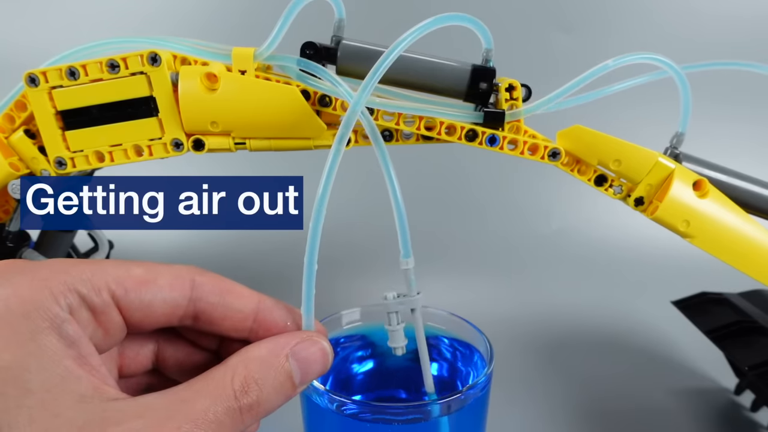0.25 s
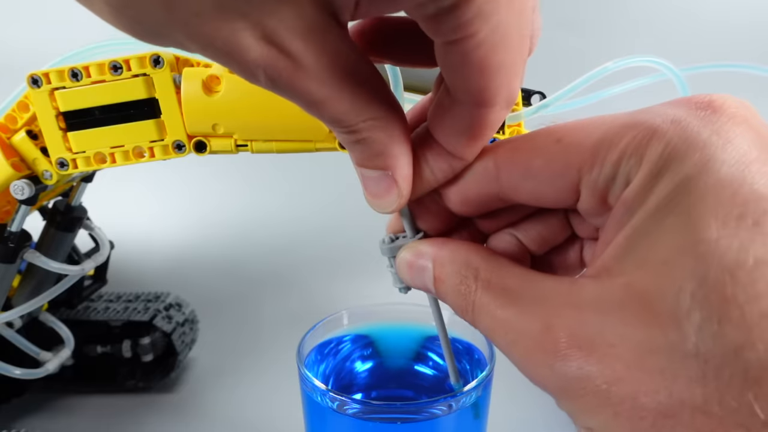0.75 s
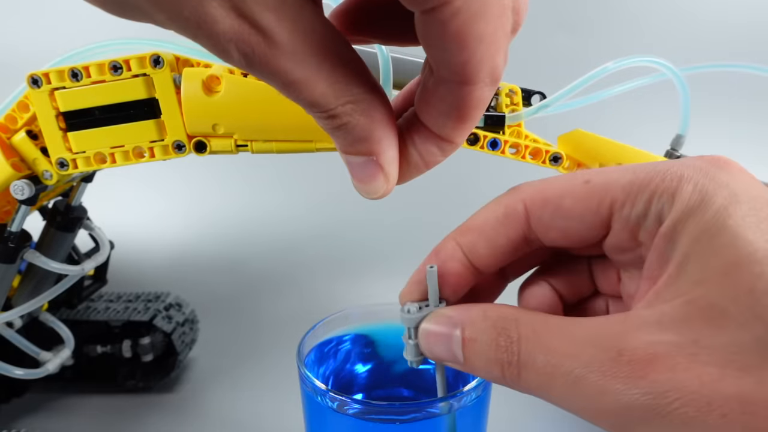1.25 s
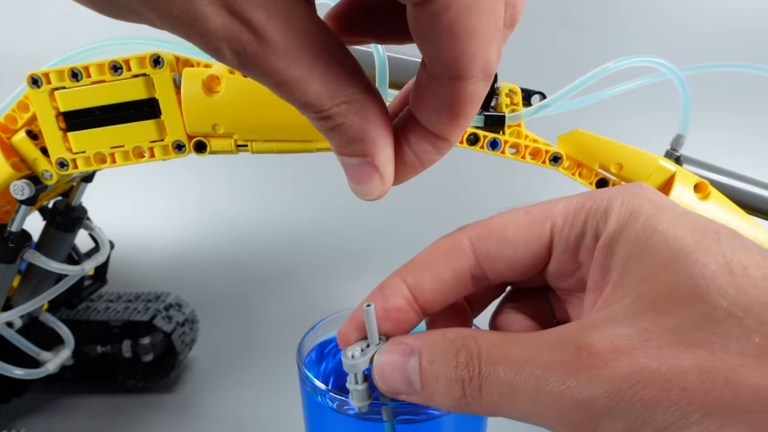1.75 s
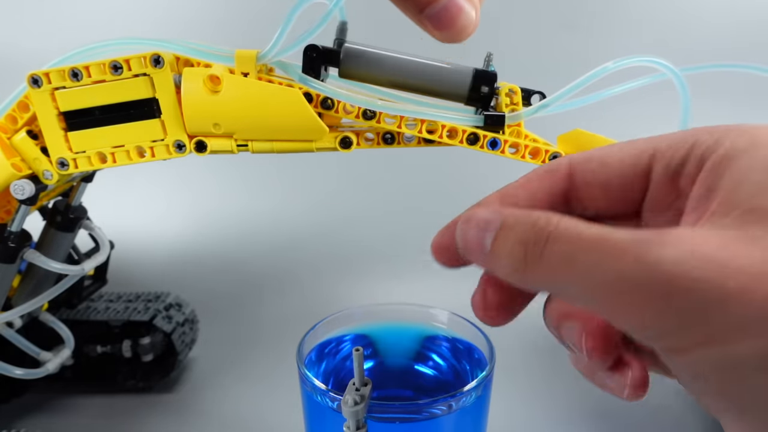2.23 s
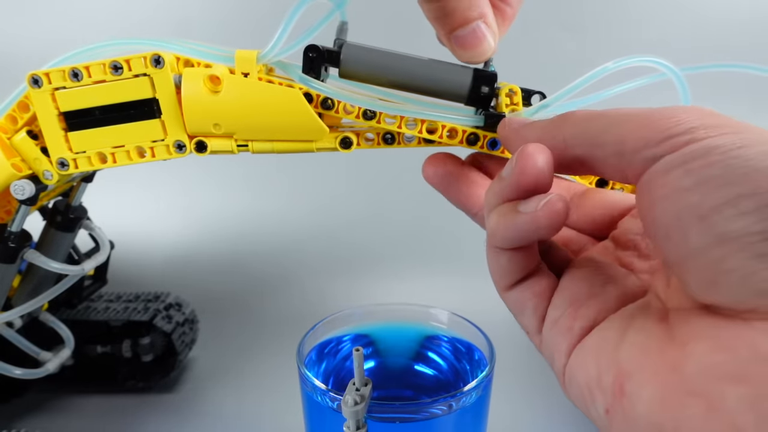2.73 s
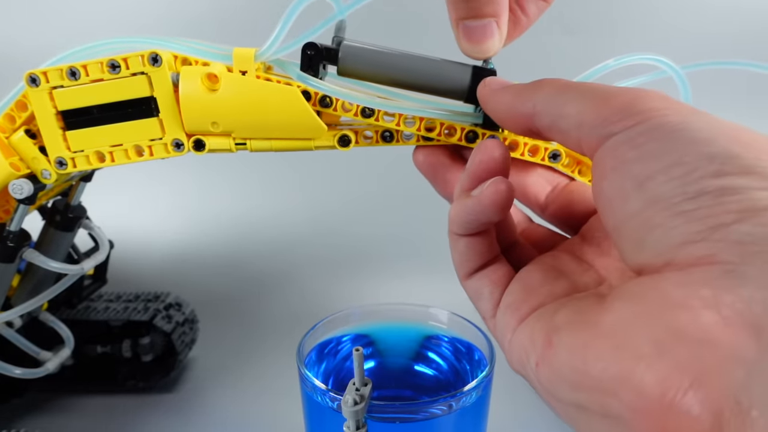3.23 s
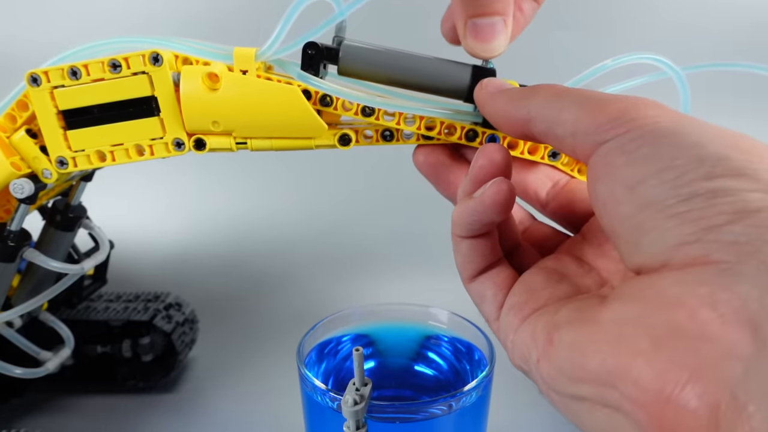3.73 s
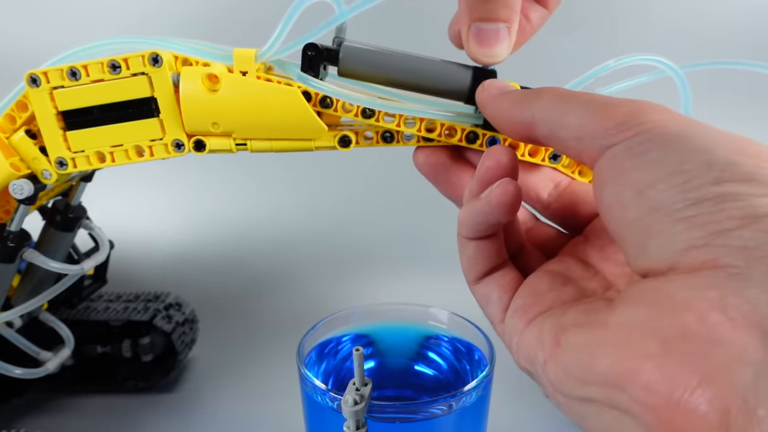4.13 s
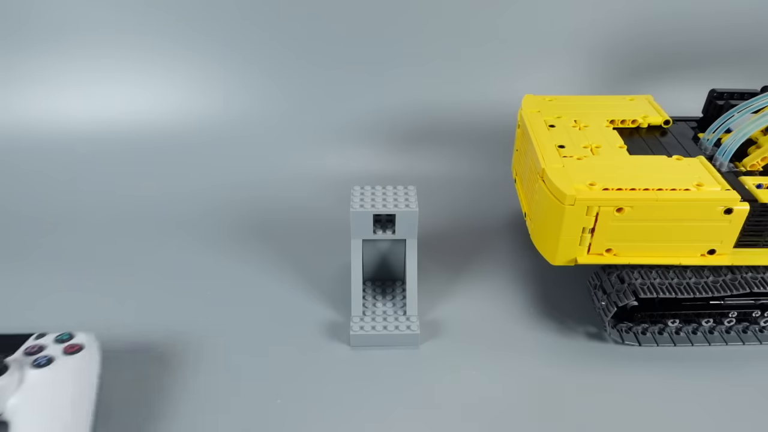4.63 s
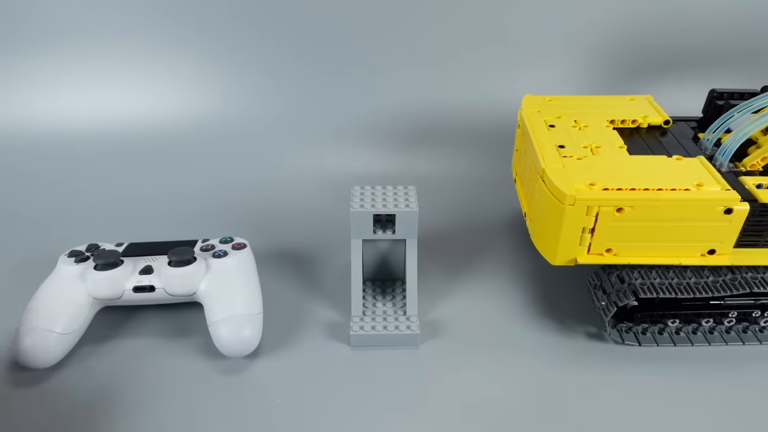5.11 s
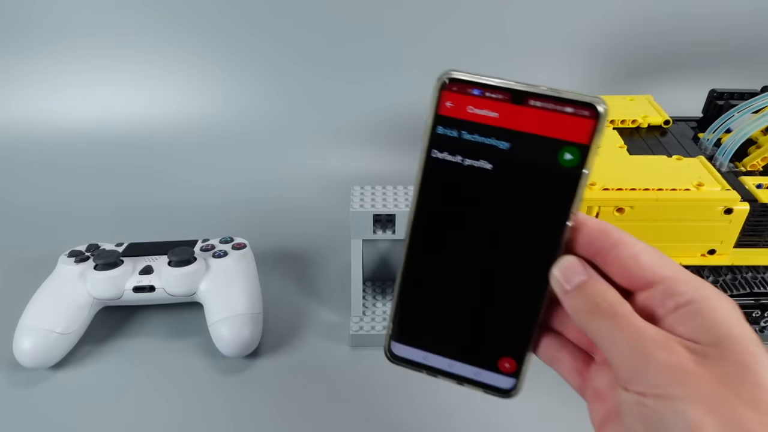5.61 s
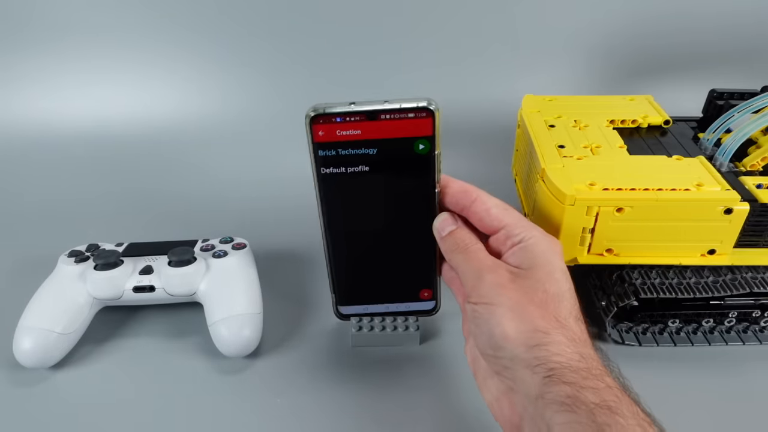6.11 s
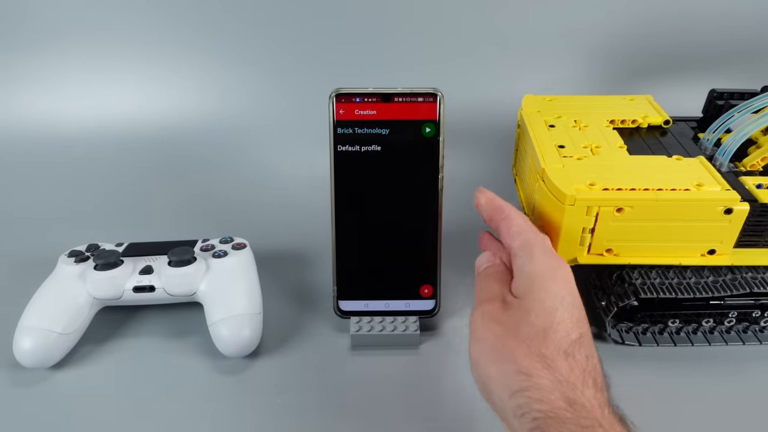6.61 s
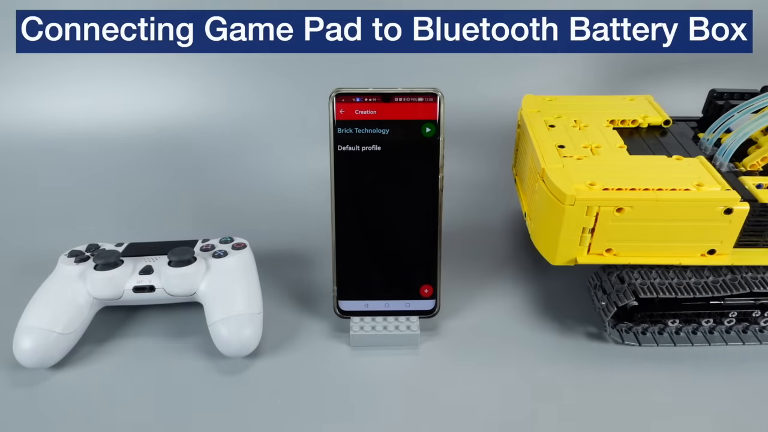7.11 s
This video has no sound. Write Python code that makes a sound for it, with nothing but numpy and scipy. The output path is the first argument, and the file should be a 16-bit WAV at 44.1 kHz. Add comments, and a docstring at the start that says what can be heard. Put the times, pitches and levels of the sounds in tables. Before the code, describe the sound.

A small motor hums briefly and cuts out, fingers clink a plastic valve on glass, then a controller slides and knocks on a bench.

```python
"""A small electric motor drives a toy pump on a workbench, runs down and is quickly faded out: rotor tones,
gear whine and brush hiss. Fingers clink a plastic valve against a glass (ringing modes) and fumble with small
parts (ticks and knocks); a plastic handset slides across the bench (stick-slip rumble, shell and scrape noise),
a phone is set into a stand with a few knocks (decaying tones, bench modes, noise bursts) and a part snaps
(damped modes). A small quiet room with hum, hiss and diffuse echoes, heard by two spaced microphones."""
import sys
import numpy as np
from scipy import signal
from scipy.fft import rfft, irfft
from scipy.io import wavfile

SR = 44100
rng = np.random.default_rng(int(sys.argv[2]) if len(sys.argv) > 2 else 0)


def unload_wav(signal):
    """Save mono or channel-first audio to the path in sys.argv[1] as 16-bit WAV at rate SR, clipped to [-1, 1]."""
    wavfile.write(
        sys.argv[1],
        SR,
        np.round(np.clip(np.atleast_2d(signal).T, -1, 1) * 32767).astype(np.int16),
    )


N = 324576

# Rotor tones. Each row: multiple of the rotor pitch, relative level in dB.
ROTOR_ORDERS = [(.5, -35.5), (1, 0), (3, -36), (4, -36.5), (5, -37.5)]
# Gear whine. Each row: full-speed pitch in Hz, width in Hz, relative level in dB, swing with the gear wheel
# and swing with the pump stroke, both as a share of the amplitude.
MESH = [(1936, 45, -9, -.45, .3), (1895, 110, -15, -.4, .3), (2540, 40, -19, 0, .2),
        (3830, 60, -21, .3, .1), (5145, 90, -15, .3, .1), (5745, 140, -7, .4, .15),
        (5610, 200, -13, .4, .15), (7765, 70, -14, .3, .1)]
# Motor housing resonances. Each row: pitch in Hz, width in Hz, relative level in dB.
HOUSING = [(579.5, 31, -9.5), (910, 44, -13.5), (1777, 170, -14), (2351, 94, -23), (5550, 237, -11),
           (6900, 45.1, -15.5), (7300, 96, -14), (8800, 83, -19), (9280, 200, -19), (11700, 110, -21)]
# Brush hiss spectrum. Each row: frequency in Hz, relative level in dB per Hz.
BRUSHES = [(300, -23.5), (700, -11.5), (1400, -14), (2000, -10), (3200, -12.5), (5700, -8), (8000, -8.5),
           (10300, -20), (13000, -19.5), (15500, -31)]
ROTOR_HZ, HUM_DB, GEAR_DB = 229, -27.5, -42.5   # rotor pitch, level of the hum, level of gears and brushes
MOTOR_BALANCE_DB, MOTOR_LAG_S = 3, .00085   # right channel of gears and brushes: softer; brush hiss also later
# rotor turns per wheel turn and per pump stroke, with starting angles
WHEEL_RATIO, WHEEL_RAD, STROKE_RATIO, STROKE_RAD = 6, 1.7, 18, 2.5
SLOWS_S, SLOWING_S, CRAWL = .485, .06, .62   # gears run down: start, time constant, final share of speed
# power off: the hum drops, the gears fade
OFF_S, HUM_DROP_S, HUM_DROP_DB, COAST_DB_PER_S = 0.5114, 0.02, -18, -240
END_S, END_FADE_S, END_FADE_DB = 0.584, 0.017, -35   # quick fade-out of motor and echoes together

# Valve against the glass, after a faint high shimmer in the first row. Each row: start in seconds, ring level
# in dB, octaves above the lowest mode where the ring is strongest, level of the lowest modes in dB, knock
# level in dB, tick level in dB.
CLINKS = [(1.215, -92, 2.8, -77, -91, -83), (1.2456, -62.5, 1.57, -70, -67, -68),
          (1.4595, -73, 2.04, -76, -63, -54.5), (1.5964, -50, 2.29, -69, -51, -58),
          (1.7667, -49, 1.52, -78.5, -52.5, -51.5), (1.8579, -56.5, 1.56, -81, -47.5, -54.5),
          (1.9159, -51.5, 2.6, -94, -51, -79), (1.935, -51, 1.7, -75, -53, -78),
          (1.947, -37.5, 1.68, -53.5, -38, -39), (1.9659, -53.5, 1.1, -68, -36.5, -58)]
# Glass modes. Each row: pitch in Hz, relative level in dB, decay time t60 in seconds.
GLASS = [(1738.5, -4, 0.42), (1748.2, -1, 0.38), (3703, -1.5, 0.2), (3710, -15, 0.55), (6354, -15, 0.26),
         (6565, -1, 0.16), (6576, -16, .35), (8359, -3, 0.09), (8821, -9, 0.11), (10280, 1, 0.11),
         (10900, -7, 0.12), (12300, -22, .06), (14620, -5, .05)]
CLINK_BELOW_DB, CLINK_ABOVE_DB = -16.5, -17   # fall per octave on each side of the strongest pitch
CLINK_CRACK_DB, CLINK_KNOCK_HZ = 1.5, 169   # crack against the ring; knock in the bench

# Fingers tap small parts, and the phone rocks in its stand. Each row: start in seconds, knock level in dB,
# tick level in dB, tick pitch in Hz.
TAPS = [(0.826, -55, -53, 1170), (0.897, -49, -60.5, 800), (0.943, -41.5, -57, 810), (0.986, -50, -74, 750),
        (1.02, -52, -66, 1000), (3.376, -55.5, -60, 950), (3.441, -51.5, -60, 920), (3.587, -52, -71, 800),
        (3.692, -66, -63, 940), (3.846, -53, -60, 1010), (3.879, -45, -72, 900), (3.928, -61, -69, 2380),
        (3.956, -49, -68, 1000), (4.002, -49, -69, 2000), (4.012, -52, -59, 1100),
        (4.056, -62, -59.5, 2570), (4.065, -57, -56, 1840), (4.096, -52, -54.5, 2050),
        (4.107, -49.5, -69, 2270), (4.126, -52, -60, 1470), (4.15, -52, -64, 890),
        (4.231, -50.5, -59, 1200), (5.66, -78, -62, 1190), (6.346, -43.5, -52, 1310),
        (6.379, -44, -52, 1170), (6.393, -45.5, -62, 1590)]
TAP_HZ, TAP_SPREAD, TAP_CRACK_DB = 215, 0.053, -6.5   # knock pitch, its log scatter, crack against tick
# Handset and phone on bench and stand: each row is a knock, or one pitch or later swing of a knock.
# Each row: start in seconds, knock level in dB, knock pitch in Hz, tick level in dB, crack level in dB,
# left minus right in dB.
KNOCKS = [(4.297, -39, 217.6, -61, -84, 5), (4.638, -9, 190, -37.5, -49.5, -3),
          (4.6552, -11, 187, -52.5, -49, -0.5), (4.841, -16, 204.2, -28.5, -65.5, -1),
          (5.012, -24, 157, -43, -83.5, 1), (6.0488, -19.5, 420, -40, -39, 0.5),
          (6.069, -21.5, 286, -33.5, -43, 3), (6.0723, -15.5, 420, -60, -60, 1),
          (6.073, -18.5, 137.6, -75, -83, -1), (6.091, -15.5, 150, -52, -78, 2),
          (6.127, -36, 188, -52, -50, 3), (6.141, -27.5, 129, -78, -80, -5),
          (6.168, -13, 407, -27.5, -30, 5.5), (6.192, -25.5, 191, -63, -42, -2),
          (6.216, -30.5, 120, -70, -85, 3.5), (6.5651, -10.5, 197, -51, -61.5, 4.5),
          (6.5665, -8.5, 395, -37.5, -30, 4.5), (6.5807, -10.5, 327, -40, -65, -4.5),
          (6.589, -14, 208, -38, -64, 3), (6.609, -19, 235, -55, -70.5, -1),
          (6.654, -23, 231, -43.5, -95, 1), (6.679, -27, 150, -57, -73, -2), (6.695, -40, 230, -54, -77, 3),
          (6.738, -42, 170, -61, -77, 0)]
# Bench modes. Each row: pitch in Hz, relative level in dB, decay time t60 in seconds.
BENCH = [(121.2, -13.5, 0.4), (146.6, -6.5, 0.4), (185.5, -1, 0.29), (261.4, -14, 0.22), (227, -1, 0.31),
         (308, -17, 0.16), (350, -4, 0.1), (384, -14.5, 0.25), (478, -16, 0.2), (540, -14.5, 0.28),
         (553, -18.5, 0.23)]
THUD_DB, THUD_FALL_DB = -14, -3.5   # thud against the knock; fall per octave away from the knock pitch
TICK_HZ, TICK_WIDTH, HAND_PAN_DB = 1040, 1.54, -0.5   # usual tick centre, edges as a ratio; left minus right
OVERTONE_HZ, OVERTONE_FALL_DB = 390, -5   # deeper knocks have weaker overtones, per octave
HAND_LAG_S = .00042   # slide, knocks and rustle reach the right microphone later

# Fingers rustle over small parts. Each row: start of the hold in seconds, hold in seconds, level in dB.
RUSTLE = [(0.942, 0.095, -64.5), (1.95, 0.0044, -46.5), (3.87, 0.057, -80), (4.05, 0.15, -72),
          (6.24, 0.17, -64)]
RUSTLE_RISE_DB_PER_S, RUSTLE_FALL_DB_PER_S = 399, 349.5

# Handset sliding. Each row: time in seconds, bench rumble in Hz, rumble level in dB, scrape level in dB.
SLIDE = [(4.27, 220, -61.5, -72), (4.385, 230.3, -35, -50.5), (4.425, 235.7, -22.5, -46.5),
         (4.48, 216.8, -20, -45), (4.54, 199.2, -21.5, -44.5), (4.61, 194, -21, -41.5),
         (4.672, 188.4, -27.5, -43.5), (4.75, 224.4, -26, -48), (4.814, 192.5, -24.5, -49),
         (4.875, 185.6, -40, -51.5), (4.97, 183.6, -32, -58.5), (5.01, 160.1, -33, -64),
         (5.22, 155.2, -67.5, -103)]
# Scrape spectrum. Each row: frequency in Hz, relative level in dB per Hz.
SCRAPE = [(380, 0), (650, -5.5), (1150, -3.5), (3150, -9), (15500, -34)]
# Handset shell resonances. Each row: pitch in Hz, width in Hz, relative level in dB.
HANDSET = [(323.1, 6.7, 12.5), (432.3, 37, 3.5), (593, 35, 5.5), (761, 36, -12.5), (913, 24, -12)]
# the handset rocks from grip to grip as it slides
ROCK_FIRST_S, ROCK_HZ, ROCK_DEPTH, ROCK_DIES_S = 4.433, 20.3, .6, .25
# shell against scrape, before and after it lies flat
LANDS_S, LANDING_S, SHELL_TILTED_DB, SHELL_FLAT_DB = 4.62, 0.057, -3.5, 12.5

# A plastic part snaps. Each row: time in seconds, level in dB.
SNAPS = [(7.3413, -24), (7.3441, -26), (7.3452, -13)]
# Modes of that part. Each row: pitch in Hz, relative level in dB, decay time t60 in seconds.
PART = [(1640, -26, 0.018), (2010, 1.5, 0.0067), (2260, -40, 0.018), (3430, -30, 0.0085),
        (4140, -19, 0.0044), (5670, -15.5, 0.0048), (7850, -8, 0.0014)]
SNAP_ROOM_DB = -14   # send into the room

# Diffuse echoes. Each row: nominal band centre in Hz, decay time t60 in seconds, relative level in dB.
ROOM = [(170, 0.21, 5.5), (500, 0.34, -0.5), (2000, 0.37, -1.5), (6000, 0.38, -4.5), (12000, 0.13, -5)]
# Room tone over time. Each row: time in seconds, hum level in dB.
STILL = [(0, -61.5), (2.2, -64), (3.3, -63.5), (4.2, -61), (5.4, -64), (7.36, -62.5)]
# Hum spectrum. Each row: frequency in Hz, relative level in dB per Hz.
HUM = [(13, -34.5), (22, -5.5), (64, -11), (80, -13.5), (97, -0.5), (123, -9), (232, -6.5), (352, -18),
       (446, -18), (523, -26), (566, -24.5), (893, -32), (2500, -44), (3250, -65), (5500, -120)]
# Hiss spectrum. Each row: frequency in Hz, relative level in dB per Hz.
HISS = [(880, -32.5), (1500, -12.5), (2630, -8.5), (2850, -9), (14200, -12), (15800, -21)]
HISS_DB = -20.5   # against the hum
DEEP_DB = -20   # what the low cut leaves of the deep bass
CUTOFF_HZ = 16000


def motor():
    """The unbalanced rotor hums through the bench; gears whine and brushes hiss through the housing."""
    turn = 2 * np.pi * ROTOR_HZ * np.arange(N) / SR
    wheel = np.cos(turn / WHEEL_RATIO + WHEEL_RAD)
    stroke = np.cos(turn / STROKE_RATIO + STROKE_RAD)
    hum = np.sqrt(2) * sum(from_db(db) * np.sin(k * turn) for k, db in ROTOR_ORDERS)
    hum = hum + from_db(-18) * narrow(0.9 * turn, 49.0)      # a neighbouring bench mode is shaken too
    hum_gain = from_db(HUM_DB + HUM_DROP_DB * ramp(OFF_S, HUM_DROP_S)) * quick_fade()

    gears = gear_whine(wheel, stroke) + brush_hiss(turn, wheel, stroke)
    left, right = gears * from_db(GEAR_DB) * gear_fade()
    left = left + resonant(left, [(1650, 270, 1.7)])      # the housing beams its middle range to the left
    air = np.array([left, right * from_db(-MOTOR_BALANCE_DB)])
    return air + hum * hum_gain * from_db([[-1.2], [1.2]])


def gear_whine(wheel, stroke):
    """Meshing teeth sing wavering tones that sink as the gears slow and swing with wheel and stroke."""
    t = np.arange(N) / SR
    speed = CRAWL + (1 - CRAWL) * np.exp(-np.maximum(t - SLOWS_S, 0) / SLOWING_S)
    run = 2 * np.pi * np.cumsum(speed) / SR
    whine = 0
    for hz, width_hz, db, wheel_swing, stroke_swing in MESH:
        load = 1 + wheel_swing * wheel + stroke_swing * stroke
        whine = whine + from_db(db) * narrow(hz * run, width_hz) * load
    return whine * from_db(-70 * (1 - speed))      # unloaded teeth hardly sing


def brush_hiss(turn, wheel, stroke):
    """Rubbing brushes make noise, partly through the housing resonances, swinging with the load."""
    white = stereo(lambda: rng.standard_normal(N), alike=0.091)
    white = white * (1 + 0.05 * np.sin(turn) + .12 * wheel + .05 * stroke)
    white = white * from_db(2.0 * narrow(0, 300))      # ragged tooth contact
    hiss = from_db(-7.5) * rms_one(resonant(white, HOUSING)) + from_db(1.0) * coloured(white, BRUSHES)
    late = np.roll(hiss[1], round(MOTOR_LAG_S * SR))      # the right microphone is further away
    return np.array([hiss[0], late])


def quick_fade():
    """Gain of the quick fade-out that takes away motor and echoes together."""
    last = ramp(END_S - END_FADE_S, END_FADE_S)
    return from_db(END_FADE_DB * last) * (last < 1)


def gear_fade():
    """Gain of the gear and brush noise as the motor coasts, then the quick fade-out."""
    return from_db(COAST_DB_PER_S * ramp(OFF_S, 1)) * quick_fade()


def clinks():
    """Each clink best rings one range of upper glass modes; its push on the whole wall rings the lowest pair."""
    s, db, best, lowest_db, *_ = np.transpose(CLINKS)      # the first row is only a faint high shimmer
    octaves = np.log2(np.array(GLASS)[:, 0] / GLASS[0][0])
    away = octaves - best[:, None]
    fall_db = CLINK_ABOVE_DB * np.maximum(away, 0) + CLINK_BELOW_DB * np.maximum(-away, 0)
    mode_db = np.where(octaves < .5, lowest_db[:, None], db[:, None] + fall_db)
    # neighbours start opposed, so pairs beat
    return struck(s, mode_db, 2.0, GLASS, spread_db=2.0, neighbour=-1)


def knocks():
    """Each row of a contact: a short knock tone, a soft thud in the bench modes, a tick and a crack of noise."""
    s, knock_db, knock_hz, tick_db, crack_db, pan_db, tick_hz = contacts()
    away = abs(np.log2(np.array(BENCH)[:, 0] / knock_hz[:, None]))
    thud_db = knock_db[:, None] + THUD_DB + THUD_FALL_DB * away
    out = struck(s, thud_db, 2.0, BENCH, spread_db=2.0)
    # the push lasts about a millisecond
    out = signal.sosfilt(signal.butter(2, 600, fs=SR, output="sos"), out)

    t = np.arange(2500) / SR
    white = rng.standard_normal((len(s), 2, 2, len(t)))      # row, tick or crack, channel, time
    white = white + 0.5 * white[:, :, ::-1, ::-1].sum(axis=2, keepdims=True)      # partly shared by both channels
    white[..., 0] += 9      # a sharp first contact
    crack = band(white[:, 1] * from_db(-60 * t / 0.034), 2300, 9500)
    crack = crack + from_db(-9) * band(white[:, 1] * from_db(-60 * t / 0.0072), 10000, 15500)      # the very edge
    for k in range(len(s)):
        low_hz, high_hz = tick_hz[k] / TICK_WIDTH, tick_hz[k] * TICK_WIDTH
        tick = band(white[k, 0] * from_db(-60 * t / 0.037), low_hz, high_hz)
        hit = from_db(knock_db[k] + 3.0) * knock_tone(t, knock_hz[k])
        hit = hit + from_db(tick_db[k] + 2.5) * tick + from_db(crack_db[k] - 6.0) * crack[k]
        at = round(s[k] * SR)
        out[:, at:at + len(t)] += hit * from_db([[pan_db[k] / 2], [-pan_db[k] / 2]])
    return -out      # the first swing pulls the air away


def contacts():
    """Columns of all contact rows: bench and stand, taps and rocking, and a knock just before each glass row."""
    rows = [(*row, TICK_HZ) for row in KNOCKS]
    for s, db, tick_db, tick_hz in TAPS:
        hz = TAP_HZ * np.exp(TAP_SPREAD * rng.standard_normal())
        rows.append((s, db, hz, tick_db, tick_db + TAP_CRACK_DB, HAND_PAN_DB, tick_hz))
    for s, db, _, _, knock_db, tick_db in CLINKS:
        crack_db = db + CLINK_CRACK_DB
        rows.append((s - .002, knock_db, CLINK_KNOCK_HZ, tick_db, crack_db, HAND_PAN_DB, TICK_HZ))
    return np.transpose(rows)


def knock_tone(t, hz):
    """A struck part swings up within a cycle and dies within a few, with two inharmonic overtones."""
    cycles = t * hz
    overtones = from_db(-10.0) * np.sin(2 * np.pi * 1.7 * cycles)
    overtones = overtones + from_db(-24.0) * np.sin(2 * np.pi * 3.646 * cycles)
    overtones = overtones * from_db(OVERTONE_FALL_DB * np.log2(OVERTONE_HZ / hz))
    envelope = from_db(-60 * cycles / 8.3) * (1 - np.exp(-(cycles / 0.4) ** 2))
    return (np.sin(2 * np.pi * cycles) + overtones) * envelope


def rustle():
    """Dense, uneven, faint ticks, duller towards the treble; each spell swells, holds and fades."""
    t = np.arange(N) / SR
    spells = 0
    for s, hold_s, db in RUSTLE:
        rise_db = RUSTLE_RISE_DB_PER_S * np.maximum(s - t, 0)
        fall_db = RUSTLE_FALL_DB_PER_S * np.maximum(t - s - hold_s, 0)
        spells = spells + from_db(db - rise_db - fall_db)
    ticks = rng.random(N) < 2500 / SR      # 2500 a second on average
    ticks = ticks * from_db(3 * np.minimum(rng.exponential(1, N), 3)) * rng.standard_normal((2, N))
    return spells * coloured(ticks, [(400, 10.5), (1000, -6.5), (3000, -24), (9000, -29.0)])


def slide():
    """Stick-slip under the handset shakes the bench, rings the shell and scrapes."""
    rumble_hz, rumble_db, scrape_db = in_time(SLIDE)
    shell_db = scrape_db + SHELL_TILTED_DB + (SHELL_FLAT_DB - SHELL_TILTED_DB) * ramp(LANDS_S, LANDING_S)
    phase = 2 * np.pi * np.cumsum(rumble_hz) / SR
    since = np.arange(N) / SR - ROCK_FIRST_S
    rocking = 1 + ROCK_DEPTH * np.exp(-abs(since) / ROCK_DIES_S) * np.cos(2 * np.pi * ROCK_HZ * since)
    steady = rocking * np.sin(phase + np.array([[.4], [-.4]]))      # regular slips
    rumble = steady + from_db(-8) * stereo(lambda: narrow(phase, 60), alike=0.1)

    grit = stereo(lambda: rng.standard_normal(N), alike=0.06)
    grit = grit * from_db(1.6 * rng.exponential(1, N))      # uneven grains
    grit = grit * from_db(1.3 * narrow(0, 80))      # the drag comes in gusts
    shell = from_db(shell_db) * rms_one(resonant(grit, HANDSET))
    scrape = from_db(scrape_db) * coloured(grit, SCRAPE)
    return (from_db(rumble_db) * rumble + shell + scrape) * during(SLIDE)


def snaps():
    """Three quick blows on a small damped part, too small to radiate bass."""
    s, db = np.transpose(SNAPS)
    blows = struck(s, np.repeat(db[:, None], len(PART), axis=1), 0, PART, spread_db=1.0)
    return band(band(blows, 1050, 15200), 1200, 5200)


def room(x):
    """Diffuse echoes: noise that dies band by band, its own for each channel."""
    t, tail = np.arange(SR // 2) / SR, 0
    edges_hz = [120, 250, 1000, 4000, 9000, 18000]
    for low, high, (_, t60, db) in zip(edges_hz, edges_hz[1:], ROOM):
        noise = band(rng.standard_normal((2, len(t))), low, high)
        tail = tail + noise * from_db(db - 60 * t / t60)
    tail = tail * np.clip(t / 0.0006 - .5, 0, 1) / np.sqrt(SR / 40)      # echoes set in within a millisecond
    return signal.fftconvolve(x, tail, axes=1)[:, :N]


def room_tone():
    """A low hum of the building and the hiss of the microphones."""
    hum = stereo(lambda: coloured(rng.standard_normal(N), HUM), alike=0.05)
    hiss = coloured(rng.standard_normal((2, N)), HISS)
    return from_db(in_time(STILL)[0]) * (hum + from_db(HISS_DB) * hiss)


def from_db(db):
    """Gain of a level in dB."""
    return 10 ** (np.asarray(db) / 20)


def rms_one(x):
    """Scaled to rms 1."""
    return x / np.sqrt(np.mean(x ** 2) + 1e-20)


def ramp(start_s, length_s):
    """0 before the start, rising straight to 1."""
    return np.clip((np.arange(N) / SR - start_s) / length_s, 0, 1)


def in_time(rows):
    """Columns of a curve table, one value a sample."""
    s, *columns = np.transpose(rows)
    return [np.interp(np.arange(N) / SR, s, c) for c in columns]


def during(rows):
    """1 inside the span of a curve table, 0 outside."""
    t = np.arange(N) / SR
    return (t >= rows[0][0]) & (t <= rows[-1][0])


def coloured(x, spectrum):
    """Signal shaped by a (Hz, dB per Hz) spectrum, falling 12 dB per octave below its lowest row; rms 1."""
    hz = np.arange(N // 2 + 1) * SR / N + 1      # 1 Hz up, to keep the logarithm finite
    at, db = np.transpose(spectrum)
    shape_db = np.interp(np.log(hz), np.log(at), db) - 12 * np.maximum(np.log2(at[0] / hz), 0)
    return rms_one(irfft(rfft(x) * from_db(shape_db), N))


def narrow(phase, width_hz):
    """Noise of a given width around a moving pitch: a wavering tone, rms 1."""
    r = np.exp(-np.pi * width_hz / SR)
    a, b = signal.lfilter([1], [1, -2 * r, r * r], rng.standard_normal((2, N)))
    return rms_one(a * np.cos(phase) + b * np.sin(phase))


def resonant(x, peaks):
    """Parallel two-pole resonances, each a (Hz, width in Hz, dB) row."""
    out = 0
    for hz, width_hz, db in peaks:
        r = np.exp(-np.pi * width_hz / SR)
        poles = [1, -2 * r * np.cos(2 * np.pi * hz / SR), r * r]
        out = out + from_db(db) * signal.lfilter([1 - r, 0, r - 1], poles, x)
    return out


def ring(clicks, hz, t60):
    """A unit click sets a decaying sine of height 1 ringing."""
    r, w = from_db(-60 / (t60 * SR)), 2 * np.pi * hz / SR
    return signal.lfilter([0, np.sin(w)], [1, -2 * r * np.cos(w), r * r], clicks + 1e-18)


def struck(times, db, pan_db, modes, spread_db, neighbour=1):
    """Each click excites all modes, with chance strengths in each channel; db is clicks x modes."""
    at, out = np.round(times * SR).astype(int), np.zeros((2, N))
    chance = rng.normal(0, 1, (len(at), len(modes), 2))
    pan = [[pan_db / 2], [-pan_db / 2]]
    for k, (hz, mode_db, t60) in enumerate(modes):
        clicks = np.zeros((2, N))
        clicks[:, at] = from_db(db[:, k] + mode_db + spread_db * chance[:, k].T + pan)
        out += neighbour ** k * ring(clicks, hz, t60)      # -1 flips every other mode
    return out


def stereo(make, alike):
    """Two channels of noise whose correlation is alike."""
    return np.sqrt((1 + alike) / 2) * make() + np.sqrt((1 - alike) / 2) * make() * [[1], [-1]]


def band(x, low_hz, high_hz):
    """Butterworth band-pass."""
    return signal.sosfilt(signal.butter(2, [low_hz, high_hz], "band", fs=SR, output="sos"), x)


def scene():
    """Handled things ring into the room; motor and echoes fade out quickly together; a low cut thins the bass."""
    pump, snap = motor(), snaps()
    left, right = slide() + knocks() + rustle()
    handled = np.array([left, np.roll(right, round(HAND_LAG_S * SR))]) + clinks()
    pump_echoes = room(band(pump, 330, 16000) + from_db(-5.5) * pump) * gear_fade()
    echoes = room(from_db(-7.0) * handled + from_db(SNAP_ROOM_DB) * snap)
    heard = pump + from_db(-6) * pump_echoes + handled + snap + echoes
    # a low cut in the microphone leaves little deep bass
    low_cut = signal.sosfilt(signal.butter(4, 118, "high", fs=SR, output="sos"), heard)
    return low_cut + from_db(DEEP_DB) * heard + room_tone()


def record(dry):
    """A steep low-pass cuts the top, 70 dB down from the cutoff upwards."""
    return signal.sosfilt(signal.cheby2(20, 70, CUTOFF_HZ, fs=SR, output="sos"), dry)


dry = scene()
out = record(dry)
unload_wav(out)
```